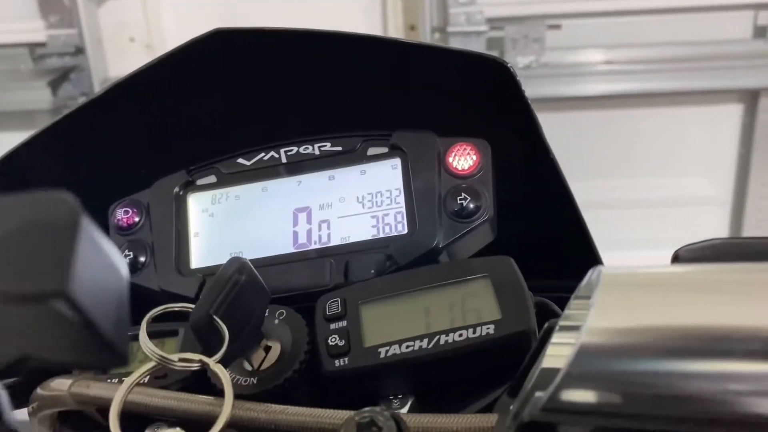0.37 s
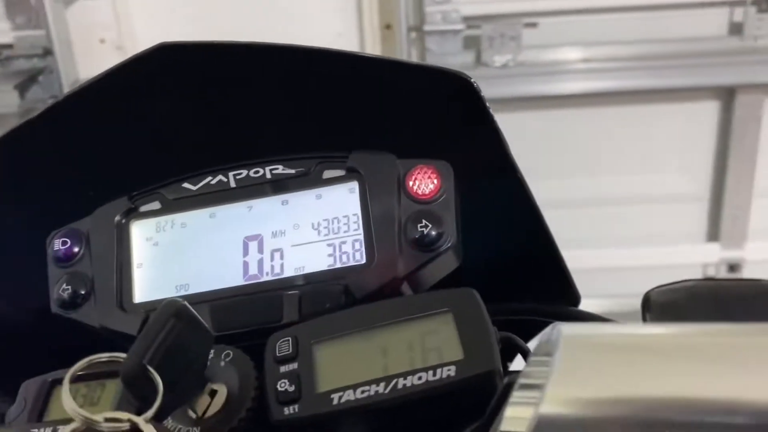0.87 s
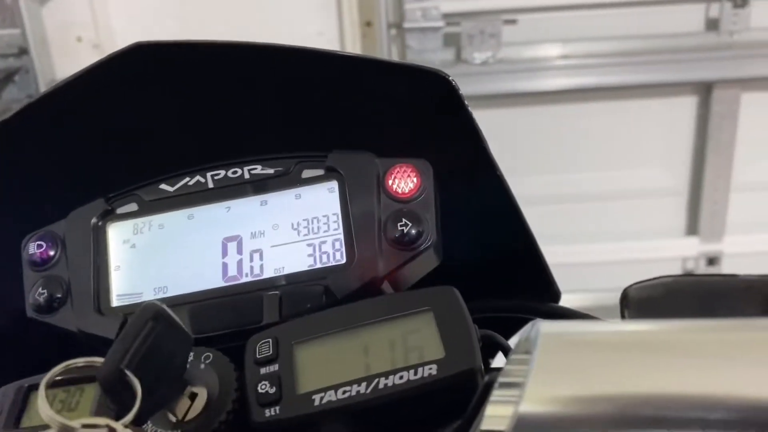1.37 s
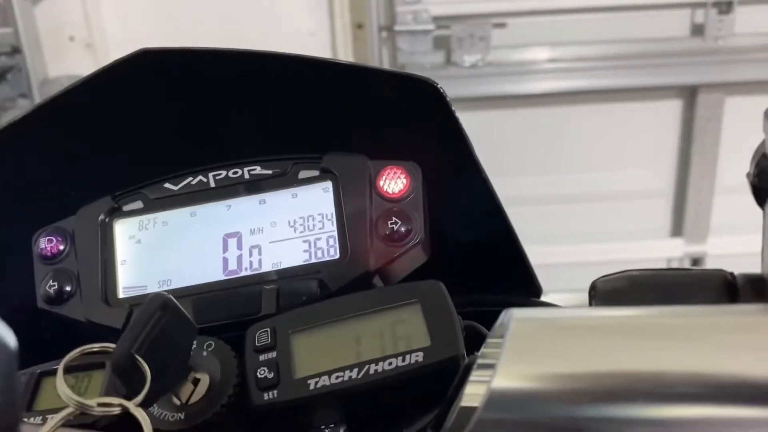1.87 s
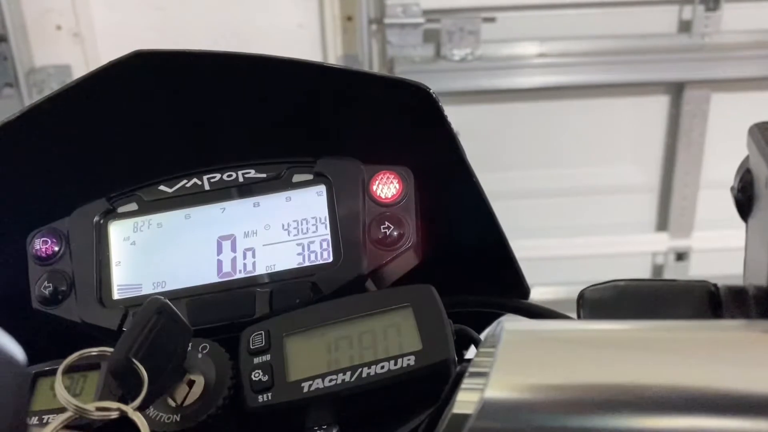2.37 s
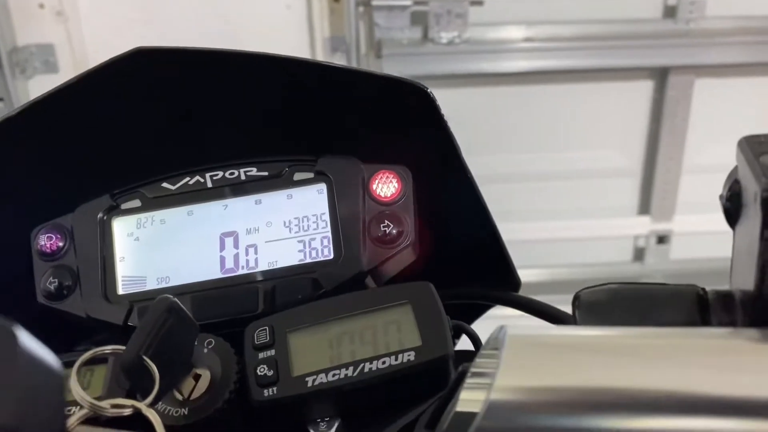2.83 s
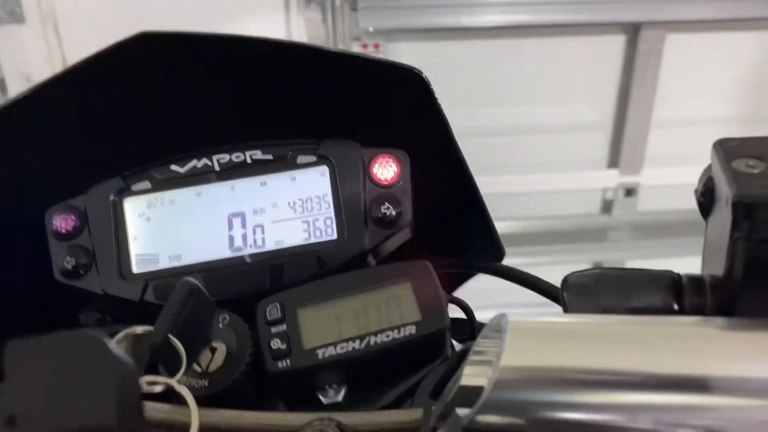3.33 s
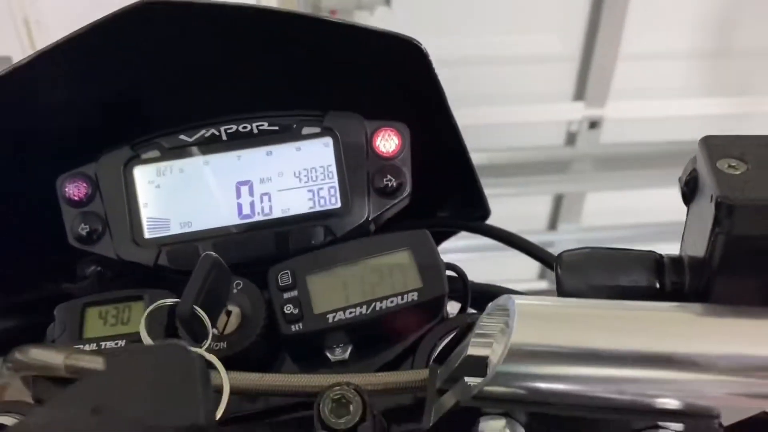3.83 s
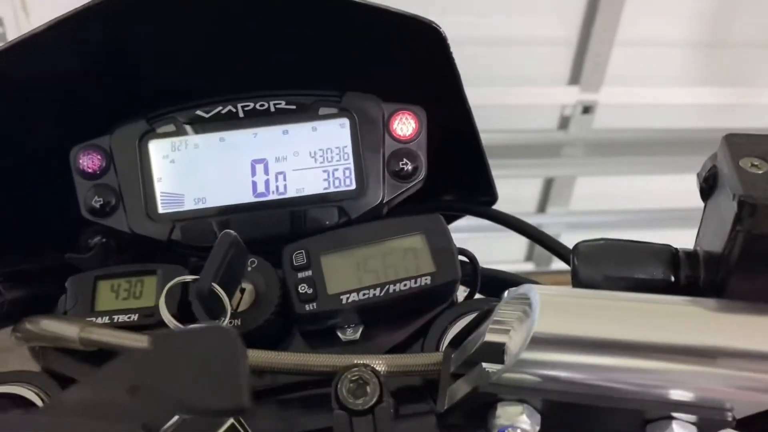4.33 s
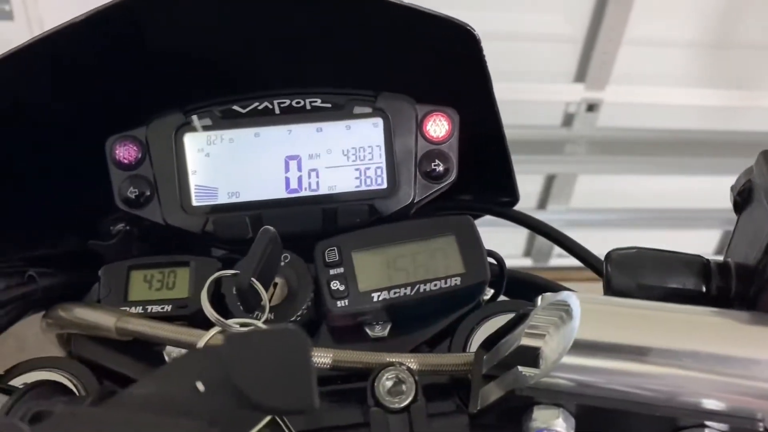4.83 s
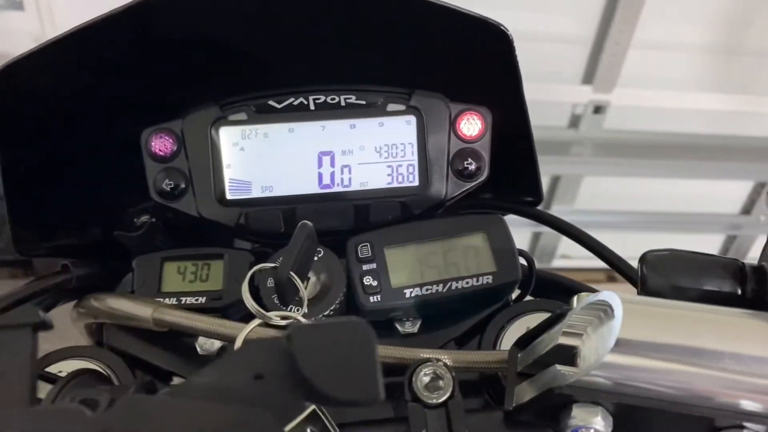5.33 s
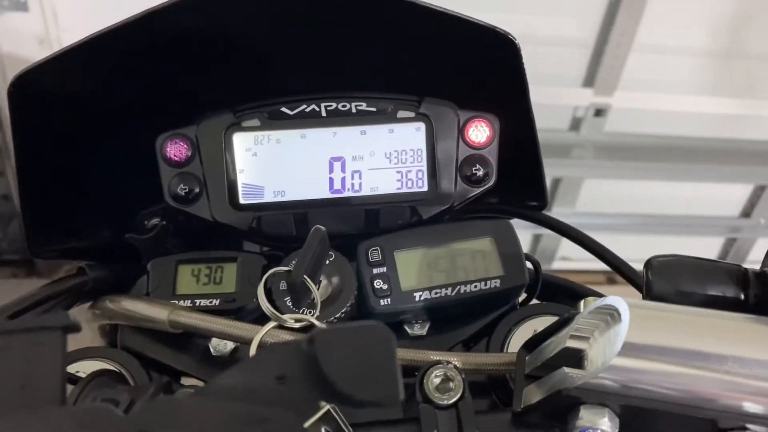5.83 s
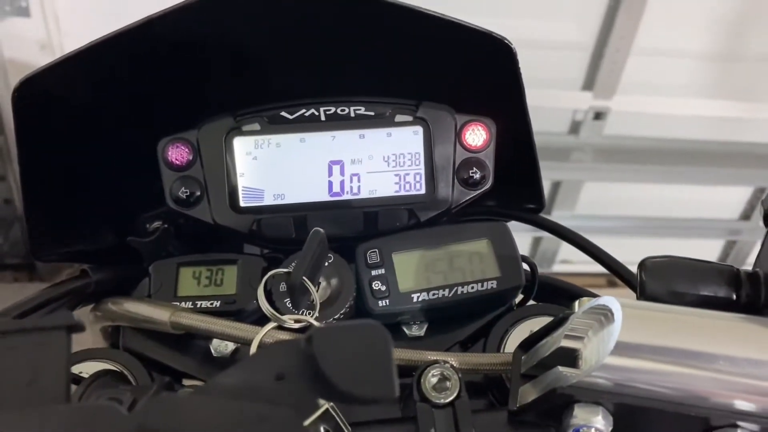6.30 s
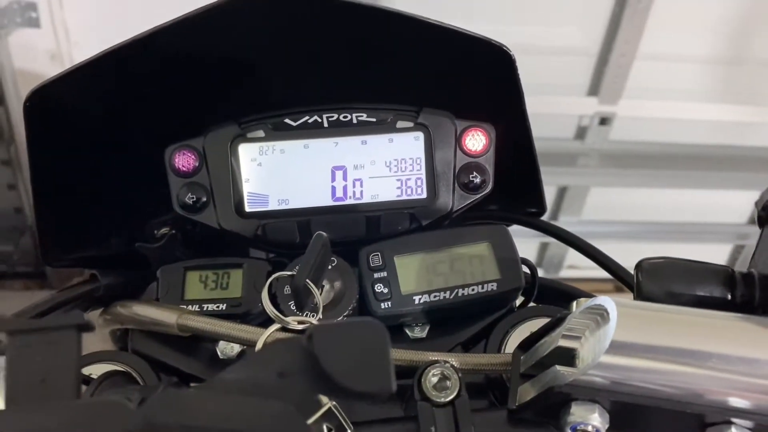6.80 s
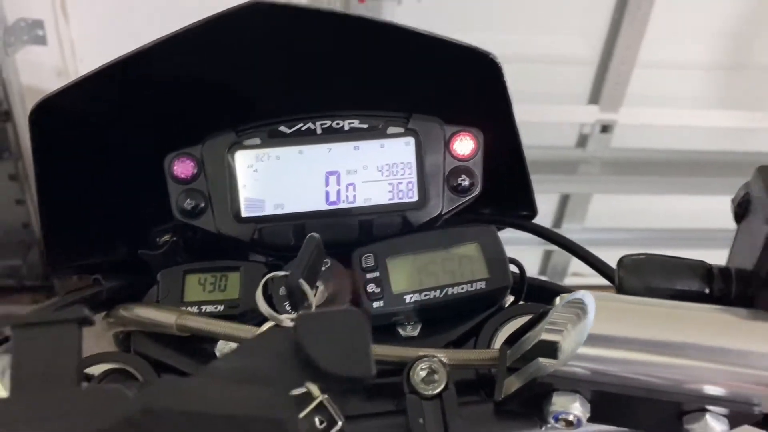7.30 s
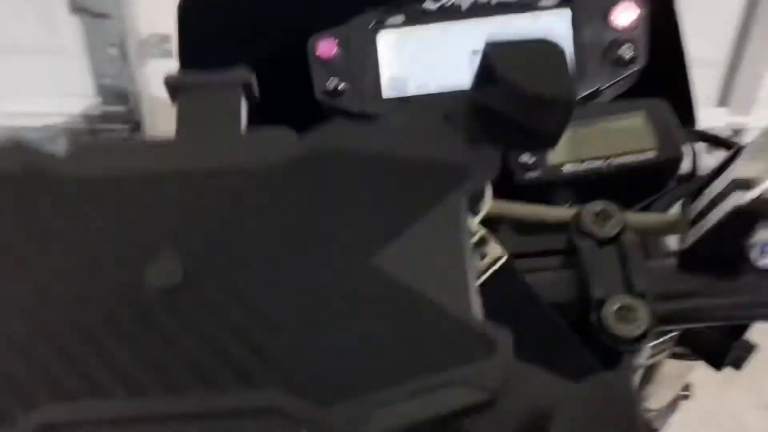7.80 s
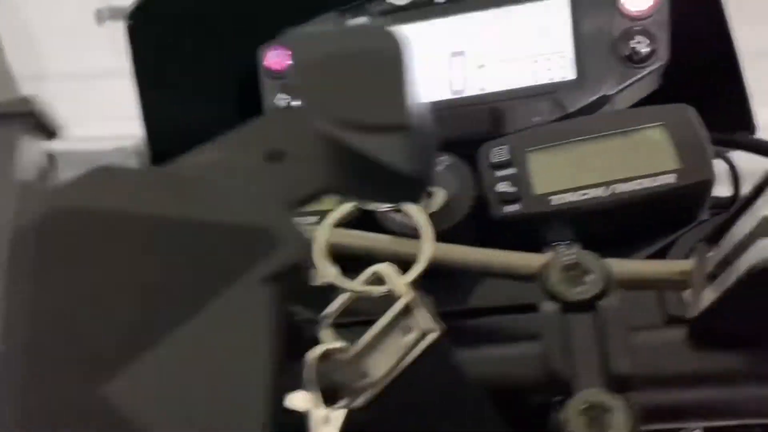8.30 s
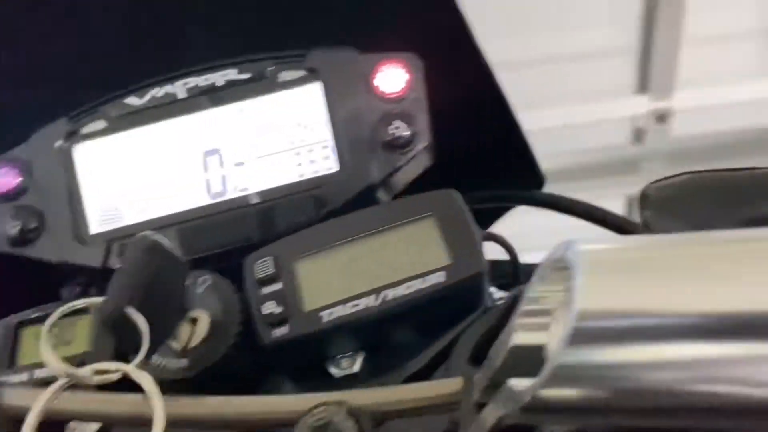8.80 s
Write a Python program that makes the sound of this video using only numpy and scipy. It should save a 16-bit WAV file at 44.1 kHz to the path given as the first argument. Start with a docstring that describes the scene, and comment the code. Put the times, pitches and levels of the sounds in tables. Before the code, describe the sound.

In a garage, a starter motor grinds harshly until a single-cylinder motorcycle engine coughs, catches unevenly and settles into a loud, thumping steady idle.

```python
"""Garage: a starter motor grinds a single-cylinder engine over until it catches, unevenly, and settles to an
idle. Each stroke rings cylinder and fin modes, then pipe modes with echoes; random wall taps add the garage.
The starter is random tooth clicks on housing modes, with noise whine, coloured whirr and slips. Valve-train
clatter and carburettor hiss are noise pulsing once an engine cycle; rattles, small dry ticks, a faint early
rustle and the garage's own noise lie underneath."""
import sys
import numpy as np
from scipy import signal
from scipy.fft import rfft, irfft
from scipy.io import wavfile
from scipy.ndimage import uniform_filter1d

SR = 44100
rng = np.random.default_rng(int(sys.argv[2]) if len(sys.argv) > 2 else 0)


def int16_out(signal):
    """Quantize to a 16-bit WAV file."""
    q = np.round(np.clip(np.atleast_2d(signal).T, -1, 1) * 32767)
    wavfile.write(sys.argv[1], SR, q.astype(np.int16))


def boost_factor(decibels):
    """Convert a level in decibels to a linear amplitude factor."""
    exponent = np.asarray(decibels, float) / 20
    return 10 ** exponent


N = 403956

# exhaust strokes: (time [s], blast level [dB], fin ring level [dB])
STROKES = [(.863, -10.5, -24), (1.1164, -3, -33), (1.1902, -6, -37), (1.314, -8, -39), (1.5077, -5.5, -25),
           (1.6256, -6, -18), (1.7465, -4, -21.5), (1.846, -3.5, -23), (1.9469, -7.5, -26.5),
           (2.077, -4, -17), (2.1758, -7.5, -37), (2.294, -3.5, -25.5), (2.385, -6, -26),
           (2.4969, -3.5, -26), (2.5893, -4, -17.5), (2.6921, -2.6, -16.5), (2.7849, -5.5, -16.5),
           (2.8962, -2.5, -23), (2.984, -2.5, -20), (3.08, -4.5, -26), (3.1917, -2.5, -23),
           (3.279, -2, -24), (3.3668, -1.3, -23), (3.4508, -2, -19), (3.5322, -1, -23),
           (3.614, -1.3, -21.5), (3.6984, -1.5, -24), (3.7808, -2, -21.5), (3.8595, -2, -19),
           (3.9331, -1.5, -22.5), (4.0118, -0.5, -32), (4.0863, -1, -30), (4.1645, -2, -20.5),
           (4.2458, -0.5, -20.5), (4.3231, -1.5, -19), (4.4023, -2, -29), (4.4799, -1.5, -16.5),
           (4.5569, -1.5, -25), (4.635, -1, -18.5), (4.712, -2, -24), (4.7909, -1, -24),
           (4.8705, -2.5, -22), (4.946, -1, -22), (5.02, -2, -21), (5.0934, -1.5, -20.5),
           (5.1684, -1.5, -32), (5.244, -1.5, -20), (5.3219, -2, -20.5), (5.4011, -1.5, -28),
           (5.4791, -1.5, -35), (5.555, -1.3, -23.5), (5.6328, -1, -35), (5.7147, -2.5, -30),
           (5.7926, -1.2, -30), (5.874, -1.5, -23), (5.9551, -0.3, -23), (6.0368, -1.3, -31),
           (6.115, -.6, -25), (6.192, -1.7, -22), (6.2677, -1.5, -34), (6.3455, -1.5, -22),
           (6.4237, -1, -16.5), (6.4997, -1, -32), (6.5784, -1.3, -29), (6.6568, -.7, -27),
           (6.7384, -2, -21), (6.8176, -1.8, -18), (6.8934, -1.5, -35), (6.971, -1.5, -25),
           (7.0468, -1, -25), (7.123, -1, -25), (7.1987, -1.5, -24), (7.2717, -1.5, -29), (7.3448, -2, -25),
           (7.4183, -1.2, -22), (7.4941, -1.5, -25), (7.571, -1.7, -41), (7.6463, -1.5, -27),
           (7.7226, -1.5, -28), (7.795, -1, -30), (7.8682, -1.5, -19.5), (7.9422, -1.5, -20.5),
           (8.0153, -0.5, -37), (8.09, -1.5, -21), (8.1634, -1.5, -29), (8.2396, -2.5, -24),
           (8.3148, -2, -42), (8.3917, -2.3, -21), (8.4676, -2, -23), (8.5411, -1, -20), (8.6142, -2, -31),
           (8.6865, -2.5, -21.5), (8.761, -2, -36), (8.8366, -2.5, -35), (8.9124, -2, -25),
           (8.9835, -2.5, -31), (9.0541, -2.8, -26), (9.123, -2.5, -32)]
# valve cover modes: (frequency [Hz], nominal width [Hz], level [dB])
TAPPETS = [(1375, 38, 1), (1940, 68, -2), (2357, 26, 0.5), (2610, 45, -6), (2840, 65, 1.5), (3220, 83, 0.5),
           (3790, 61, -8.5), (4056, 27, -4.5), (4330, 12, -6.5)]
FULL_BLAST_DB = -2.5  # strokes below this are weak: dull, low thumps, some unfired


def evened(x):
    """Scales to rms 1."""
    return x / np.sqrt(np.mean(x ** 2) + 1e-20)


def read(points, hz):
    """Reads a table on a log-frequency axis."""
    f, value = np.transpose(points)
    return np.interp(np.log(hz + 1), np.log(f + 1), value)


def curve(rows):
    """Columns of a time table, interpolated at every sample."""
    s, *columns = np.transpose(rows)
    return [np.interp(np.arange(N) / SR, s, c) for c in columns]


def add(mix, s, sound):
    """Mixes a sound in at s seconds."""
    part = mix[round(s * SR):][:len(sound)]
    part += sound[:len(part)]


def resonate(x, hz, width_hz):
    """A two-pole resonance of peak gain 1."""
    return signal.lfilter(*signal.iirpeak(hz, hz / width_hz, SR), x)


def ring(modes, scatter_db, stretch):
    """Struck modes: sines that build up and die away, all pitches scaled by stretch."""
    hz, db, t60_s, rise_ms, polarity = np.transpose(modes)[:, :, None]
    t = np.arange(round(.3 * SR)) / SR
    swell = np.sign(polarity) * (1 - np.exp(-1000 * t / np.maximum(rise_ms, .1)))
    envelope = boost_factor(db + scatter_db[:, None] - 60 * t / t60_s) * swell
    return (envelope * np.sin(2 * np.pi * hz * stretch * t)).sum(0)


def sagging(starts_s, tops_db, holds_s, fall_db_per_s):
    """A level in dB that jumps up at each start, holds, then sinks at a steady rate."""
    t, level_db = np.arange(0, N, 64) / SR, -99.
    for s, top_db, hold_s in zip(starts_s, tops_db, holds_s):
        sunk_db = fall_db_per_s * np.maximum(t - s - hold_s, 0)
        level_db = np.maximum(level_db, np.where(t < s, -99., top_db - sunk_db))
    return np.repeat(level_db, 64)[:N]


def noise(spectrum, patchy_db):
    """Diffuse stereo noise of rms 1: coloured, partly coherent, with drifting time-frequency patches."""
    # left-right likeness: (frequency [Hz], power coherence [0-1])
    coherence = [(60, 1), (290, 0.23), (640, 0.021), (1400, 0.057), (3100, 0.36), (6800, 0.054), (8500, 1),
                 (15000, 0.71)]
    # phase by which left leads: (frequency [Hz], lead [rad])
    lead_rad = [(0, 0), (1720, -0.4), (3190, 0.9), (3880, 0.3), (6460, 0.3), (8180, -2.8), (8870, -3.5),
                (9730, -6.3), (10800, -6.6), (11500, -9.4), (12800, -9.5), (13200, -12.5), (14600, -12.7),
                (15200, -15.6)]
    frames, hz = N // 128 + 5, np.fft.rfftfreq(512, 1 / SR)
    a, b, c, d, patches = rng.standard_normal((frames, 257, 5)).T
    patches = uniform_filter1d(patches, size=5, axis=0)
    patches = evened(uniform_filter1d(patches, size=14, axis=1))
    same = np.sqrt(np.clip(read(coherence, hz), 0, 1))[:, None]
    left, other = a + 1j * b, c + 1j * d
    lag = np.exp(-1j * read(lead_rad, hz))[:, None]
    z = np.array([left, same * left * lag + np.sqrt(1 - same ** 2) * other])
    z *= boost_factor(read(spectrum, hz)[:, None] + patchy_db * patches)
    return evened(signal.istft(z, nperseg=512, noverlap=384)[1][:, :N])


def room_tone():
    """Garage at rest: steady coloured noise."""
    # colour: (frequency [Hz], relative density [dB per Hz])
    room_colour = [(18, -33), (30, -11), (54, 13), (117, -18), (395, -17), (434, -23.5), (490, -24.5),
                   (1690, -34), (7620, -61), (9000, -55), (11700, -70), (19800, -120)]
    return boost_factor(-46) * noise(room_colour, patchy_db=1.5)


def rustle():
    """A faint coloured noise that dies away from the start, 60 dB in 0.59 s."""
    dying = boost_factor(-49.0 - 60 * np.arange(N) / SR / 0.59)
    colour = [(300, -22), (900, -2), (1600, -4), (3000, -13), (7000, -27), (10000, -50)]
    return dying * noise(colour, patchy_db=-1.5)


def ticks():
    """Small dry ticks: differenced noise puffs decaying 60 dB in 16 ms."""
    # (time [s], level before differencing [dB])
    puffs = [(2.8818, -40.5), (5.5947, -32), (8.538, -39), (9.0705, -28), (9.0874, -35), (9.1416, -35)]
    out, t = np.zeros(N), np.arange(600) / SR
    for (s, db), puff in zip(puffs, rng.standard_normal((len(puffs), 600))):
        add(out, s, boost_factor(db - 60 * t / 0.016) * np.diff(puff, prepend=0))
    return out


def rattles():
    """Loose tappet runs: decaying noise on the four upper modes of the valve cover."""
    # (time [s], level [dB])
    runs = [(3.419, -34), (4.0908, -26.5), (4.4056, -36), (5.1104, -41), (6.1194, -32), (6.289, -34),
            (7.3688, -33)]
    out, decay = np.zeros(N), np.exp(-np.arange(3000) / (0.016 * SR))
    for (s, db), r in zip(runs, rng.standard_normal((len(runs), 3000))):
        rung = sum(resonate(r, hz, 2 * width_hz) for hz, width_hz, _ in TAPPETS[-4:])
        add(out, s, boost_factor(db) * decay * evened(rung))
    return out


def tappets():
    """Random taps in clumps ring the valve cover; each mode swells on its own."""
    out = np.zeros((2, N))
    for hz, width_hz, db in TAPPETS:
        clumps = boost_factor(3.5 * evened(uniform_filter1d(rng.standard_normal(N), size=2200)))
        taps = rng.standard_normal((2, N)) * (rng.random(N) < 900 / SR) * clumps  # 900 taps/s
        crossed = taps + 0.15 * taps[::-1]  # some of each channel in the other
        out += boost_factor(db) * evened(resonate(crossed, hz, 1.66 * width_hz))
    return evened(out)


def running_gear():
    """Clatter and intake hiss pulse once an engine cycle; each stroke kicks the clatter, the hiss swells."""
    # clatter colour: (frequency [Hz], relative density [dB per Hz])
    clatter_colour = [(380, -7.5), (480, -7), (920, -7.5), (1250, -15.5), (1800, -12.5), (2100, -18),
                      (3300, -21.5), (4350, -29.5), (4750, -28.5), (6500, -28.5), (7900, -31),
                      (10500, -34.5), (15500, -45)]
    # clatter just after a full stroke: (time [s], level [dB])
    full_kick = [(1.5, -20.5), (1.72, -21.5), (1.9, -25), (2.3, -28), (3.3, -25), (4.5, -24.5), (6.5, -25),
                 (9.16, -26)]
    # swells of intake hiss: (start [s], level [dB], hold [s], pitch [Hz])
    swells = [(1.837, -42.5, 0.045, 6260), (2.068, -47, 0.028, 6080), (2.301, -43.5, 0.044, 5820),
              (2.49, -41.5, 0.19, 6150), (2.74, -49, .03, 6200), (2.885, -40, .04, 5820),
              (2.988, -41, 0.047, 6230), (3.275, -40.5, 0.053, 6670), (3.37, -38, 0.089, 6400),
              (3.7, -40, .1, 6430), (3.949, -39.5, .04, 6250), (4.1, -41, 0.057, 6520),
              (4.32, -43, 0.13, 6200), (4.56, -38, .04, 6420), (4.782, -41, 0.089, 6340),
              (5.102, -40, 0.035, 6300), (5.25, -38.5, 0.13, 6300), (5.57, -39, 0.063, 6400),
              (5.949, -44, 0.101, 6090), (6.26, -38, 0.089, 6460), (6.677, -39, .12, 6420),
              (7.131, -42.5, 0.075, 6400), (7.35, -40.5, 0.22, 6580), (7.649, -41.5, 0.042, 6430),
              (7.94, -39.5, 0.037, 6750), (8.19, -41, 0.043, 6560), (9.05, -39.5, .1, 6400)]
    # hiss between swells: (time [s], level [dB])
    hiss_rest = [(1.6, -52), (3, -58), (3.6, -45), (9.16, -47)]
    kick_loss, kick_early_s = 1.44, 0.015  # dB of kick lost per dB of weakness
    sag_db_per_s, hiss_fade_db_per_s = 35.5, 103

    s, blast_db, _ = np.transpose(STROKES)
    weak_db = np.minimum(blast_db - FULL_BLAST_DB, 0)
    kicks_db = sagging(s - kick_early_s, kick_loss * weak_db, 0 * s, sag_db_per_s)
    clatter_db = curve(full_kick)[0] + uniform_filter1d(kicks_db, size=500)

    start_s, swell_db, hold_s, pitch_hz = np.transpose(swells)
    hiss_db = sagging(start_s, swell_db, hold_s, hiss_fade_db_per_s)
    hiss_db = uniform_filter1d(np.maximum(hiss_db, curve(hiss_rest)[0]), size=700)
    hiss_hz = curve(np.transpose([start_s + hold_s / 2, pitch_hz]))[0]

    cycle = np.interp(np.arange(N) / SR, s, np.arange(len(STROKES)))

    def beat(peak_cycles):
        return np.cos(2 * np.pi * (cycle - peak_cycles))

    grit = boost_factor(0.9 * evened(uniform_filter1d(rng.exponential(1, N) - 1, size=40)))
    clatter = noise(clatter_colour, patchy_db=2.0) * grit + boost_factor(-11) * tappets()
    clatter = boost_factor(clatter_db + 1.36 * beat(0.3)) * clatter
    breath = noise([(30, -0.5), (450, -7), (700, -5.5), (1400, -30.5)], patchy_db=2.0)
    carrier = np.cos(2 * np.pi * np.cumsum(hiss_hz) / SR)
    hiss = np.sqrt(2) * breath * carrier  # a band of noise around the jet pitch
    hiss = boost_factor(hiss_db + 2.2 * beat(0.39)) * hiss
    on = np.clip((np.arange(N) / SR - 1.48) / 0.17, 0, 1)
    return on * (clatter + hiss)


def slips():
    """Starter gears slipping under load: short uneven runs of tooth blows, each on one mode."""
    # (middle [s], level before envelope [dB], length at half height [s], mode [Hz])
    runs = [(0.762, -25, 0.025, 2000), (0.767, -25.5, 0.057, 248), (.778, -20.5, 0.023, 1165),
            (0.775, -23, 0.021, 1690), (0.79, -23.5, 0.031, 900), (0.955, -18, 0.011, 2580),
            (0.952, -22.5, .012, 4040), (0.979, -24, 0.011, 2560), (1.074, -22, .014, 2550),
            (1.08, -16.5, 0.014, 1190), (1.09, -29, 0.026, 258), (1.4, -20.5, 0.0094, 1570),
            (1.471, -24, 0.022, 1230), (1.479, -27, 0.017, 940)]
    out = np.zeros(N)
    for (s, db, length_s, hz), r in zip(runs, rng.random((len(runs), 4000))):
        r = r[:round(2 * length_s * SR)]
        struck = np.diff(np.floor(np.cumsum(r) * 700 / SR), prepend=0)  # about 350 blows/s
        blows = struck * (0.11 + r[::-1])
        add(out, s - length_s, boost_factor(db) * np.hanning(len(r)) * evened(resonate(blows, hz, 58)))
    return out


def starter():
    """Dense tooth clicks ring the housing, with a fuzzy whine and slips; returns these and the whirr."""
    # drive: (time [s], effort [dB])
    effort = [(0.68, -61), (0.69, -25), (0.752, -16.5), (0.876, -24.5), (0.94, -22.5), (0.952, -15.5),
              (1.048, -20.5), (1.076, -12), (1.114, -20.5), (1.224, -29.5), (1.384, -26), (1.4, -16.5),
              (1.43, -28), (1.464, -13.5), (1.566, -30), (1.7, -25)]
    # level of the whirr's treble: (time [s], gain [dB])
    whirr_treble = [(.69, 3.5), (.752, -24), (.876, 1.5), (1.1, 1), (1.3, -2.5), (1.4, 3.5), (1.7, -3)]
    # housing modes: (frequency [Hz], width [Hz], relative density [dB per Hz])
    casing = [(928, 110, 7.5), (1140, 150, 7), (1570, 66, 9), (1975, 28, 8), (2590, 20, 9.5),
              (3080, 29, -4), (3640, 41, -43), (4000, 137, -17), (4330, 37, -10), (4800, 41, -20),
              (5100, 60, -16), (5250, 89, -14), (6080, 58, -4), (7270, 61, -35)]
    # gear mesh bands: (frequency [Hz], width [Hz], level over effort [dB])
    mesh = [(930, 60, -12.5), (1570, 75, -16), (3186, 66, -17.5)]
    # whirr colour: (frequency [Hz], relative density [dB per Hz])
    grind = [(180, -63), (300, -31), (731, -3.5), (821, 1), (907, -9), (2280, -7.5), (2560, -5.5),
             (6460, -16), (8420, -20), (11000, -24.5), (15500, -38)]
    effort_db, treble_db = curve(effort)[0], curve(whirr_treble)[0]

    clicks = rng.random(N) < 1500 / SR  # 1500 clicks/s
    teeth = rng.standard_normal(N) * boost_factor(3.4 * rng.exponential(1, N)) * clicks
    housing = evened(sum(boost_factor(db) * evened(resonate(teeth, hz, width_hz)) * np.sqrt(width_hz)
                         for hz, width_hz, db in casing))
    whine = sum(boost_factor(db) * evened(resonate(rng.standard_normal(N), hz, width_hz))
                for hz, width_hz, db in mesh)

    whirr = noise(grind, patchy_db=3.0)
    highpass = signal.butter(N=2, Wn=2300, btype="high", fs=SR, output="sos")
    whirr = whirr + (boost_factor(treble_db) - 1) * signal.sosfilt(highpass, whirr)

    t = np.arange(N) / SR
    turning = (t > effort[0][0]) * np.clip((effort[-1][0] - t) / .12, 0, 1)
    level = turning * boost_factor(effort_db)
    return level * (boost_factor(-8.5) * housing + whine) + slips(), level * boost_factor(-3.5) * whirr


def engine():
    """Each stroke knocks the cylinder and rings the fins, then blasts through the pipe, never quite alike."""
    # exhaust pipe and silencer: (frequency [Hz], level [dB], t60 [s], build-up [ms], polarity)
    pipe = [(56, -15, 0.52, 3.6, 1), (76.4, -6.5, 0.16, 5.7, -1), (106.6, -1, 0.086, 7.4, 1),
            (132.7, -8, 0.52, 8.5, 1), (155.2, -11, 0.34, 43, 1), (201.9, -4, 0.24, 3.5, 1),
            (233.4, -6.5, 0.27, 0.66, -1), (254.8, -6.5, 0.21, 29.4, 1), (276.5, -16.5, 0.93, 0.66, 1),
            (315.4, -16.5, 0.56, 0.6, 1), (334.4, -17, 0.52, 30, 1), (353.6, -21.5, 0.41, 14, -1),
            (361.9, -6, 0.097, 2.1, -1), (437, -26, 0.49, 20.5, -1)]
    # cylinder: (frequency [Hz], level [dB], t60 [s], build-up [ms], polarity)
    cylinder = [(634.5, -9.5, 0.066, 0.15, 1), (734, -19, 0.017, 0.69, 1), (927, 3, 0.021, 0.85, 1),
                (1090, -13, 0.077, 0.49, 1)]
    # fins: (factor on fin ring frequency, level [dB], t60 [s], build-up [ms], polarity)
    fins = [(.93, -9.5, 0.047, 1.9, 1), (1.001, 5, 0.051, 2.5, 1), (1.055, -0.5, .04, 1.5, 1)]
    # blast, direct and returned: (delay [ms], left gain, right gain)
    echoes = [(0, 0.91, 1), (7.785, -0.086, -0.27), (9.36, -0.36, -0.4), (21.75, -0.31, -0.41),
              (26.88, 0.26, 0.12)]
    pipe_lag_s, fin_lag_s, valve_lag_s = 0.00256, 0.001054, 0.034  # after the knock
    knock_full_db, knock_loss, knock_scatter_db = -12, 3.8, 1.07  # loss: dB per dB of weakness
    dull, dull_power = 0.62, 1.32
    cool_flat = 0.0062  # cooler gas of a weak stroke rings flatter: share per dB

    blasts, knocks = np.zeros(N), np.zeros(N)
    octaves = np.log2(np.transpose(pipe)[0] / 75)
    for (s, blast_db, fin_db), r in zip(STROKES, rng.standard_normal((len(STROKES), 24))):
        weak_db = min(blast_db - FULL_BLAST_DB, 0)
        # a weak stroke is a slow push: less of the upper modes
        dull_db = -dull * (-weak_db) ** dull_power * octaves
        stretch = 1 + cool_flat * weak_db + 0.0059 * r[-1]
        blast = boost_factor(blast_db) * ring(pipe, dull_db + 0.91 * r[:len(pipe)], stretch)
        add(blasts, s + pipe_lag_s, blast)

        knock_db = knock_full_db + knock_loss * weak_db + knock_scatter_db * r[-3]
        knock = boost_factor(knock_db) * ring(cylinder, 0.24 * r[-6:-2], 1 + 0.011 * r[-2])
        add(knocks, s, knock)
        add(knocks, s + valve_lag_s, boost_factor(-13.5 + 3.0 * r[-7]) * knock)  # valves seat

        fin_hz = 1728.72 + 53.9 * r[-4]
        fin_modes = [(fin_hz * factor, *mode) for factor, *mode in fins]
        add(knocks, s + fin_lag_s, boost_factor(fin_db) * ring(fin_modes, 2.2 * r[-10:-7], 1))
    returns = np.zeros((2, 2000))
    for ms, *gains in echoes:
        returns[:, round(ms * SR / 1000)] += gains
    return signal.oaconvolve(blasts[None], returns, axes=1)[:, :N], knocks


def garage(x):
    """Direct sound, then sparse wall taps of random sign, each band dying at its own speed."""
    # (frequency [Hz], t60 [s], reverberant energy [dB re direct])
    walls = [(60, 0.49, -15), (149, 0.25, -13.5), (322, 0.93, -10.5), (650, 0.85, 0), (2000, 0.78, 0.5),
             (6000, 0.78, 4.5), (12000, 0.15, -12)]
    taps = np.zeros((2, SR // 2))
    slots = np.arange(200, SR // 2 - 20, 20)  # one tap in every 20 samples
    at = slots + rng.integers(0, 20, (2, len(slots)))
    np.put_along_axis(taps, at, rng.choice([-1., 1.], at.shape), 1)
    hz, t, z = signal.stft(taps, SR, nperseg=1024)
    wall_hz, t60_s, wall_db = np.transpose(walls)
    t60_s = read(np.transpose([wall_hz, t60_s]), hz)[:, None]
    wall_db = read(np.transpose([wall_hz, wall_db]), hz)[:, None]
    unit_energy = np.sqrt(20 * 6 * np.log(10) / (t60_s * SR))  # energy 1 at 0 dB
    z *= boost_factor(wall_db - 60 * t / t60_s) * unit_energy
    response = signal.istft(z, SR, nperseg=1024)[1]
    response[:, 0] += 1
    return signal.fftconvolve(x * np.ones((2, 1)), response, axes=1)[:, :N]


def scene():
    """Engine, starter gears and rattles ring in the garage, over the diffuse noises."""
    gears, whirr = starter()
    blasts, knocks = engine()
    reverberant = garage(blasts + knocks + gears + rattles())
    return reverberant + ticks() + whirr + running_gear() + rustle() + room_tone()


def low_pass(x):
    """Removes everything above the highest recorded frequency."""
    return signal.sosfilt(signal.butter(12, 15690, fs=SR, output="sos"), x)


def record(dry):
    """Bass cut, a small left-right tilt by frequency, soft overload."""
    # (frequency [Hz], left over right [dB])
    balance = [(200, 1.5), (380, 2.5), (700, -1.5), (1300, -1.5), (2400, 1.5), (4400, 1.5), (9000, 0)]
    ceiling = 1.17  # overload level
    highpass = signal.butter(N=2, Wn=45, btype="high", fs=SR, output="sos")
    cut = signal.sosfilt(highpass, dry)
    tilt_db = read(balance, np.fft.rfftfreq(N, 1 / SR)) / 2
    tilted = irfft(rfft(cut) * boost_factor(np.array([tilt_db, -tilt_db])), N)
    mix = ceiling * np.tanh(tilted / ceiling)
    return low_pass(mix)


dry = scene()
out = record(dry)
int16_out(out)
```